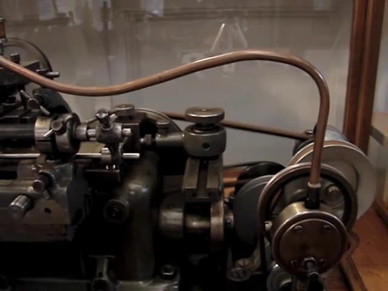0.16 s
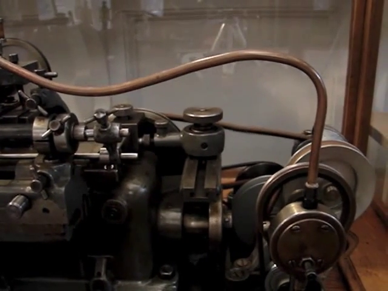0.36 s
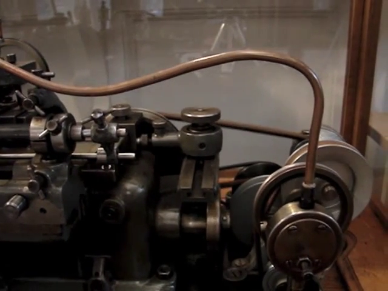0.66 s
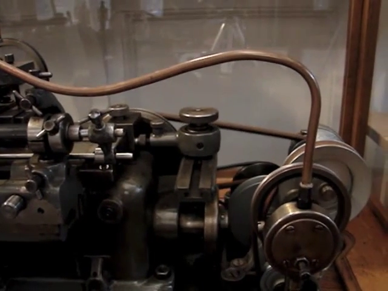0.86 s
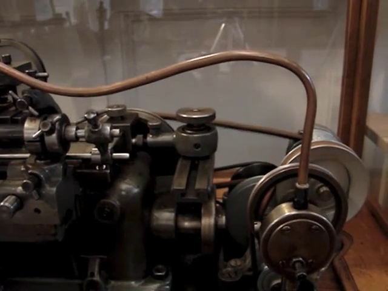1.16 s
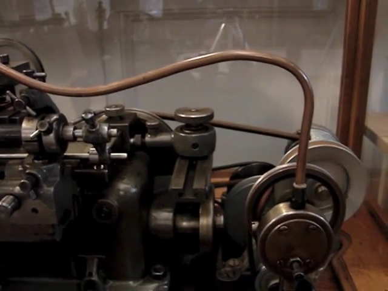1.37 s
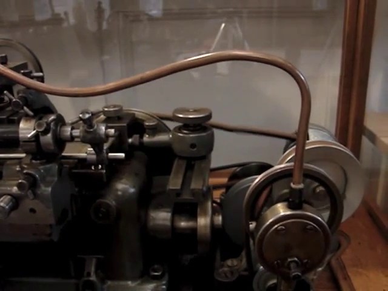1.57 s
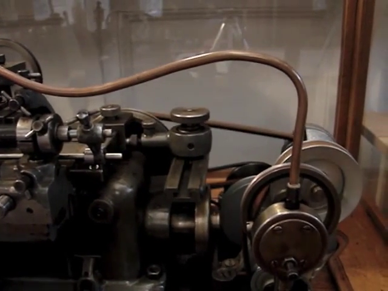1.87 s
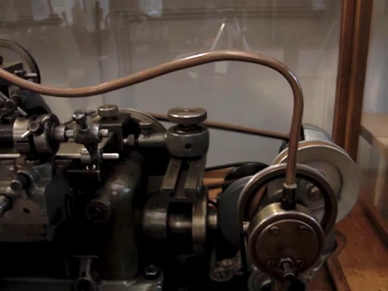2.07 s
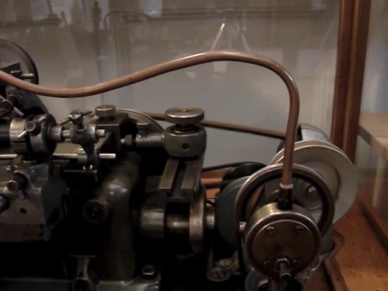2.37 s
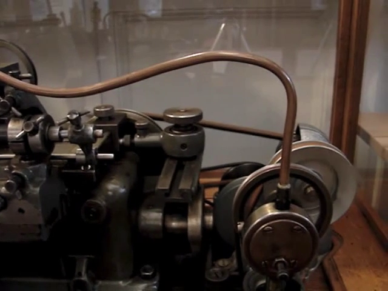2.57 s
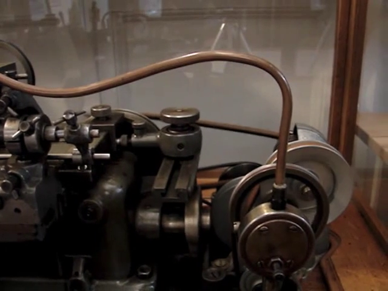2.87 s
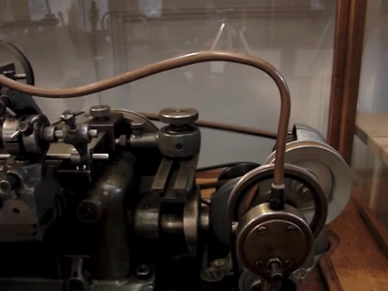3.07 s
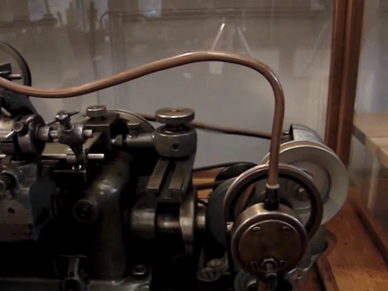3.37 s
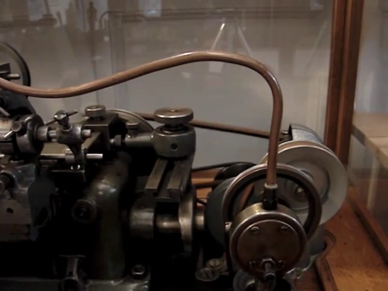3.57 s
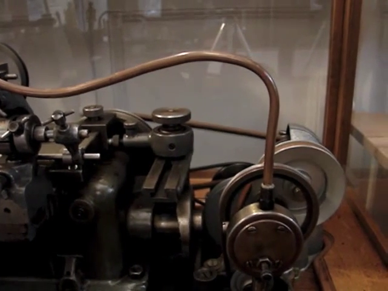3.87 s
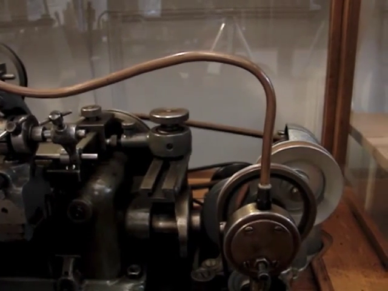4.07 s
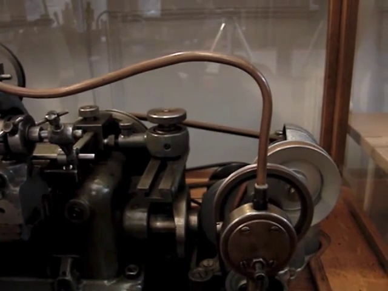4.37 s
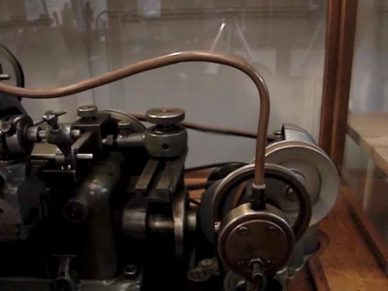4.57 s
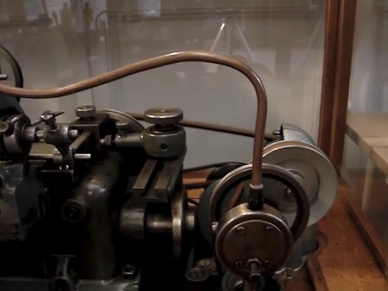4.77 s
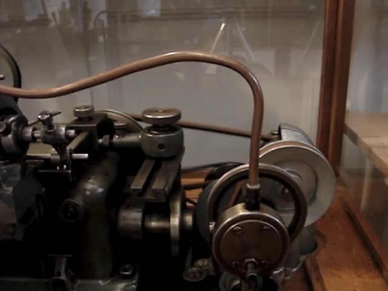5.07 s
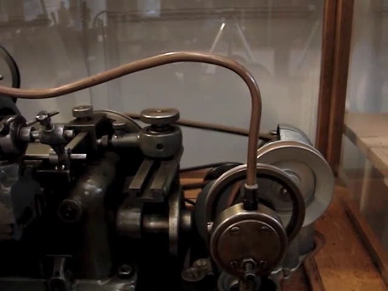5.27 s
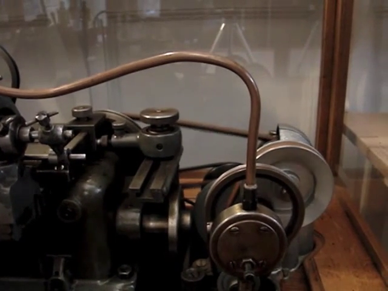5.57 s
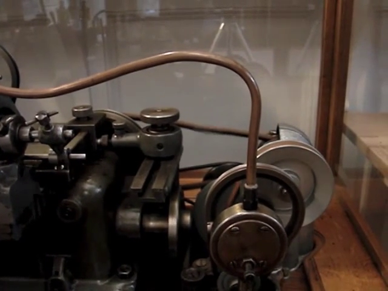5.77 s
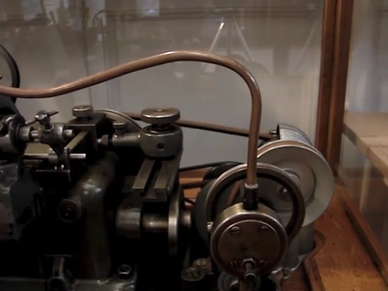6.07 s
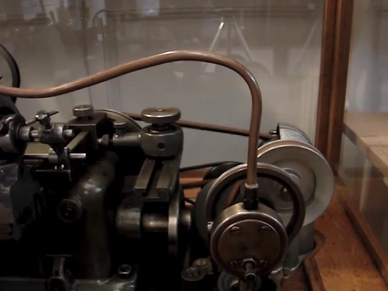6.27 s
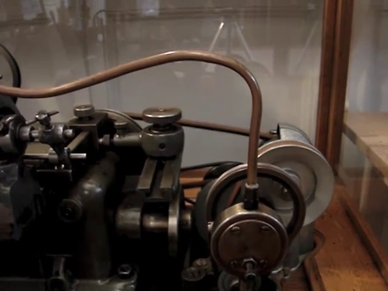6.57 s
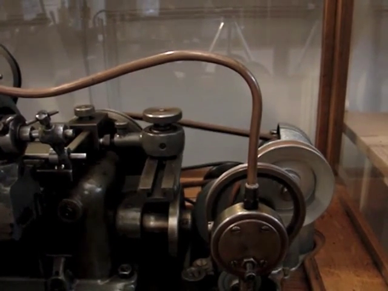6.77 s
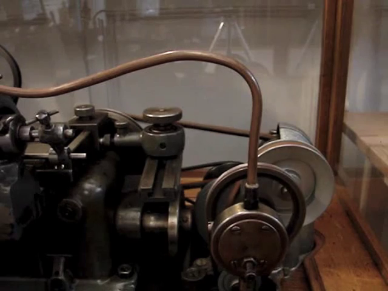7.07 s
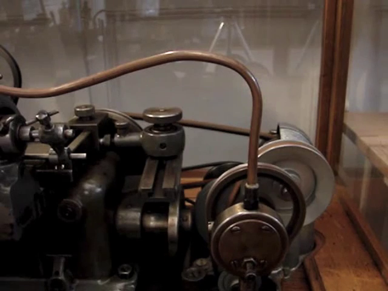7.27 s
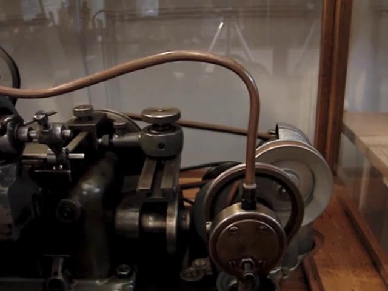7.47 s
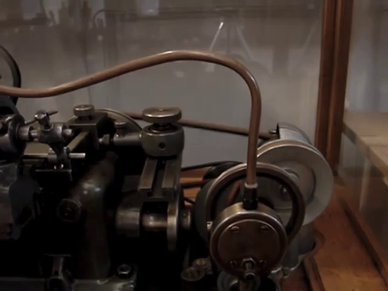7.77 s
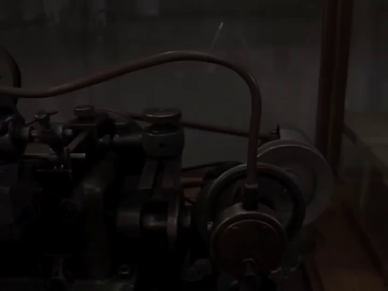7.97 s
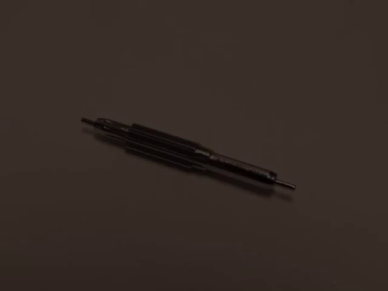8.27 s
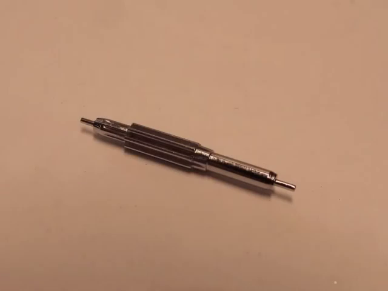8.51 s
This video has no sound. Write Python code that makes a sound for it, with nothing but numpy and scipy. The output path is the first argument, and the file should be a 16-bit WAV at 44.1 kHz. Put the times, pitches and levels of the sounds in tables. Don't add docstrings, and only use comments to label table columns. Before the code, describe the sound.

An old belt-driven metal lathe runs without cutting in a workshop. Dense, rough gear and bearing chatter rings through the iron casting, with a fast fluttering pulse from the spindle. Small bright rattles flick out now and then above a faint mains hum and bench rumble. A small mono camera microphone hears it at a steady level until a half-second fade to silence.

```python
import sys
import numpy as np
from scipy import signal
from scipy.fft import rfft, irfft, next_fast_len
from scipy.io import wavfile
from scipy.ndimage import uniform_filter1d, map_coordinates

SR = 44100
rng = np.random.default_rng(int(sys.argv[2]) if len(sys.argv) > 2 else 0)


def convert_level_to_amplitude(level_db):
    exponent = np.asarray(level_db, float) / 20
    return 10 ** exponent


def persist_wave(psi):
    counts = np.round(np.clip(psi, -1, 1) * 32767).astype(np.int16)
    wavfile.write(sys.argv[1], SR, np.atleast_2d(counts).T)


N = 381024


def unit(x):
    return x / np.sqrt(np.mean(x ** 2) + 1e-20)


def along(points, hz):
    point_hz, value = np.transpose(points)
    return np.interp(np.log(hz + 1), np.log(point_hz + 1), value)


def wobble(rate):
    grid = np.arange(0, N + 32, 32)
    curve = map_coordinates(rng.standard_normal(4000), [grid * rate / SR])
    return np.interp(np.arange(N), grid, curve)


def coloured(x, gain):
    m = 2 * next_fast_len(N // 2 + SR // 4)
    cepstrum = irfft(np.log(gain(np.fft.rfftfreq(m, 1 / SR)) + 1e-6), m)
    cepstrum[1:m // 2] *= 2
    cepstrum[m // 2 + 1:] = 0
    response = np.exp(rfft(cepstrum))
    return irfft(rfft(x, m) * response, m)[:N]


def patchy(x, depth_db, bins, frames):
    spectrum = signal.stft(x, nperseg=1024)[2]
    field = rng.standard_normal(spectrum.shape)
    for axis, size in ((0, bins), (1, frames), (0, bins), (1, frames)):
        field = uniform_filter1d(field, size, axis)
    return signal.istft(spectrum * convert_level_to_amplitude(depth_db * unit(field)), nperseg=1024)[1][:N]


# (pitch_hz, width_hz, level_db over the broad chatter,
# drift_db change at either end of the camera's drift)
RESONANCES = [(259, 25, 6.0, 0.9), (412, 35, 5.8, 0.7), (491, 17, 4.3, 1.1), (518, 17, 9.2, 1.2),
              (574, 30, 10.1, 0.0), (607, 25, 9.7, 0.1), (635, 21, 9.8, 0.4), (838, 39, 3.5, 1.1),
              (948, 26, 7.7, 0.6), (1028, 25, 7.8, -0.4), (1109, 47, 8.6, 1.6), (1220, 35, 6.0, -0.7),
              (1260, 19, 5.4, 0.0), (1328, 18, 6.7, -0.3), (1388, 29, 10.3, -1.5), (1479, 150, 3.7, -0.3),
              (1512, 48, 8.5, 0.9), (1700, 22, 2.9, 0.7), (1804, 48, 6.1, 0.7), (1951, 61, 3.3, -0.3),
              (2232, 108, 7.7, -1.1), (2304, 40, 8.9, -0.7), (2427, 78, 2.6, -0.4), (2531, 70, 10.7, -0.4),
              (2720, 34, 6.6, -0.6), (2827, 65, 5.7, -0.0), (2963, 48, 4.3, 0.6), (3176, 40, 6.7, -0.1),
              (3268, 107, 3.0, 0.2), (3827, 67, 2.8, 1.1)]
# (pitch_hz, level_db per Hz)
BROAD_CHATTER = [(90, -40), (150, -8), (210, -11.5), (330, -8), (460, -3.2), (700, -1.3), (1100, 0),
                 (2050, -5.5), (3300, -6.2), (4200, -6.6), (5600, -11.3), (7800, -18), (8800, -16.9),
                 (9900, -18.9)]


def casting(hz, place, ripple):
    peaks = 0
    for pitch_hz, width_hz, level_db, drift_db in RESONANCES:
        height = convert_level_to_amplitude(level_db + 1.3 * place * drift_db) ** 2 - 1
        peaks = peaks + height / (1 + (1.3 * (hz - pitch_hz) / width_hz) ** 2) ** 2
    small_db = .9 * map_coordinates(ripple, [hz / 30]) * (hz > 2900)
    return convert_level_to_amplitude(along(BROAD_CHATTER, hz) + small_db) * np.sqrt(1 + peaks)


CHATTER_DB = -17.5
# (start_s middle of the slip, change_db)
BELT_SLIPS = [
    (.36, -1.1),
    (1.42, -0.6),
    (3.3, -0.9),
    (3.75, -1.5),
    (3.87, 1.6),
    (6.63, -1),
]


def load_db():
    creep_db_per_s, slip_s = 0.06, 0.057
    t = np.arange(N) / SR
    slips_db = sum(db * np.exp(-((t - s) / slip_s) ** 2) for s, db in BELT_SLIPS)
    return CHATTER_DB + creep_db_per_s * t + slips_db


def chatter():
    spindle_hz, touches_per_s = 43.1, 900
    turn = 2 * np.pi * np.cumsum(spindle_hz * (1 + .01 * wobble(2))) / SR
    touches = rng.random(N) < touches_per_s / SR
    knocks = unit(touches * -convert_level_to_amplitude(12 * rng.random(N)))
    drive = convert_level_to_amplitude(-9) * knocks + rng.standard_normal(N)
    drive *= convert_level_to_amplitude((.55 + .35 * wobble(1.5)) * np.cos(turn))
    drive *= convert_level_to_amplitude(.6 * wobble(25) + .9 * wobble(70))
    ripple = rng.standard_normal(2000)
    moved = np.linspace(0, 1, N)
    ring = (1 - moved) * coloured(drive, lambda hz: casting(hz, -1.2, ripple))
    ring += moved * coloured(drive, lambda hz: casting(hz, 0.91, ripple))
    ring = patchy(ring, .4, bins=4, frames=50)
    ring = patchy(ring, .9, bins=30, frames=3)
    return convert_level_to_amplitude(load_db()) * unit(ring)


# (start_s, level_db over the chatter)
GEAR_RATTLES = [(2.645, -4.5), (2.843, -0.5), (3.148, -5.5), (3.88, -3.5), (4.004, 0.5), (4.171, -3),
                (4.778, -2), (5.0, -4), (5.098, -2), (5.564, -3), (6.06, -3), (6.405, -5), (7.178, -2),
                (7.291, -2.5), (7.742, -1)]


def rattles():
    centre_hz, width_hz, t60_s = 3740, 2600, 0.065
    hits = np.zeros(N)
    for start_s, level_db in GEAR_RATTLES:
        hits[round(start_s * SR)] = convert_level_to_amplitude(CHATTER_DB + level_db)
    decay = convert_level_to_amplitude(-60 * np.arange(SR // 10) / SR / t60_s)
    band = lambda hz: 1 / (1 + ((hz - centre_hz ** 2 / (hz + 1)) / width_hz) ** 2)
    noise = unit(coloured(rng.standard_normal(N), band))
    return signal.fftconvolve(hits, decay)[:N] * noise


def tone(hz, db, drift, sway_db):
    phase = 2 * np.pi * (np.cumsum(hz * (1 + drift * wobble(3))) / SR + rng.random())
    return np.sqrt(2) * convert_level_to_amplitude(db + sway_db * wobble(4)) * np.sin(phase)


# (pitch_hz, level_db rms)
MAINS_HUM = [(119.98, -34.3), (128.6, -48), (140.6, -52), (149.4, -51), (210.6, -60)]
# (order in multiples of the shaft speed, level_db rms)
SHAFT_TONES = [(1, -66), (4, -56), (6, -58), (10, -59), (12, -51), (14, -50), (16, -55), (18, -50)]
# (pitch_hz, level_db per Hz)
BENCH_RUMBLE = [(5, -13), (22, -7), (50, -10), (80, -3.5), (105, -1.5), (140, -4.5), (200, -24.5)]


def motor():
    shaft_hz = 28.77
    hum = sum(tone(hz, db, drift=.0001, sway_db=.5) for hz, db in MAINS_HUM)
    shaft = sum(tone(k * shaft_hz, db, drift=.002, sway_db=5.0) for k, db in SHAFT_TONES)
    bench = coloured(rng.standard_normal(N), lambda hz: convert_level_to_amplitude(along(BENCH_RUMBLE, hz)))
    return hum + shaft + convert_level_to_amplitude(-43.5 + 1.5 * wobble(7)) * unit(bench)


def scene():
    return (chatter() + rattles() + motor())[None]


def steadied(x):
    power = np.abs(uniform_filter1d(x ** 2, SR // 12)) + 1e-12
    x = x * (np.mean(power) / power) ** .2
    return x / (1 + np.abs(x / .8) ** 4) ** (1 / 4)


def coarse(x, size, step_db, from_hz):
    n, k = np.arange(2 * size), np.arange(size // 2)
    window = np.sin(np.pi * (n + .5) / (2 * size))
    basis = window * np.cos(np.pi / size * np.outer(k + .5, n + .5 + size / 2))
    hops = np.pad(x, (size, 2 * size - N % size)).reshape(-1, size)
    lines = np.hstack([hops[:-1], hops[1:]]) @ basis.T
    near = np.sqrt(np.abs(uniform_filter1d(lines ** 2, size // 16, 1))) + 1e-12
    share = np.clip((k + .5) * SR / 2 / size / from_hz, .01, 1) ** 2
    luck = rng.standard_normal((len(lines), 17))
    short_db = 1.2 * np.clip(luck[:, :1], -2, 1.5) + 1.3 * np.repeat(luck[:, 1:], size // 32, 1)
    step = near * share * convert_level_to_amplitude(step_db + short_db)
    frames = (step * np.round(lines / step)) @ basis * 2 / size
    return (frames[1:, :size] + frames[:-1, size:]).ravel()[:N]


def band_limit(x):
    return signal.sosfilt(signal.butter(12, 10660, fs=SR, output="sos"), x)


# (start_s, end_s)
FADE_OUT = (7.73, 8.222)


def record(dry):
    heard = coloured(steadied(dry[0]), lambda hz: 1 / (1 + (hz / 10030) ** 150))
    short = np.clip(4 * (wobble(16) - .6), 0, 1)
    rounded = (1 - short) * coarse(heard, size=2048, step_db=8.2, from_hz=7200)
    rounded += short * coarse(heard, size=256, step_db=7.6, from_hz=5500)
    top = coloured(rounded, lambda hz: 1 / (1 + (hz / 10230) ** 600))
    fade = np.interp(np.arange(N) / SR, FADE_OUT, (1, 0))
    return band_limit(top[None] * fade)


dry = scene()
out = record(dry)
persist_wave(out)
```